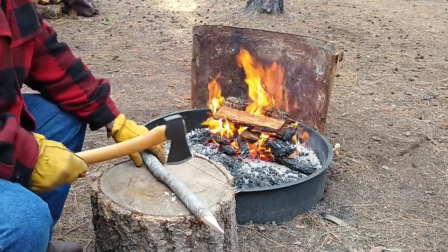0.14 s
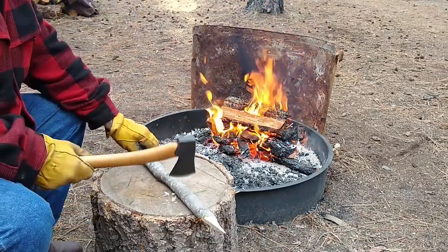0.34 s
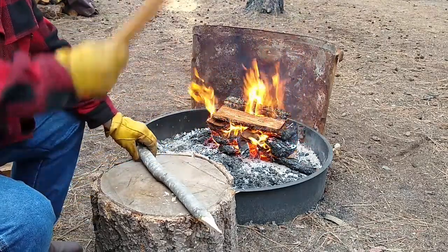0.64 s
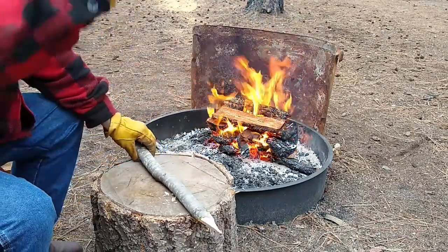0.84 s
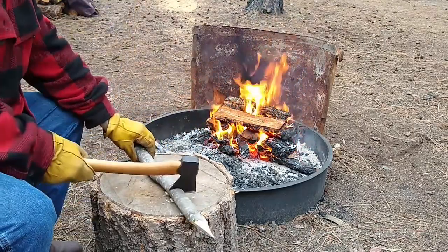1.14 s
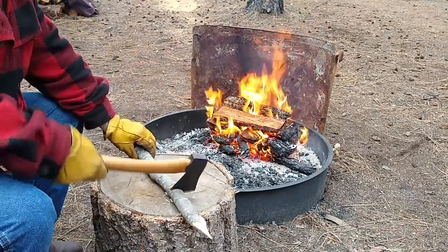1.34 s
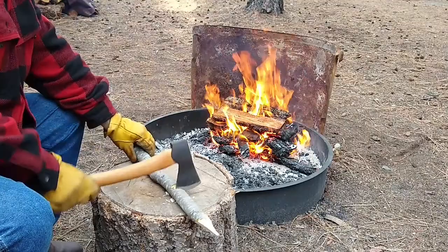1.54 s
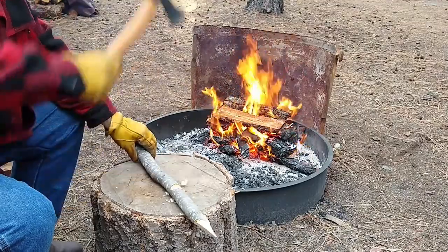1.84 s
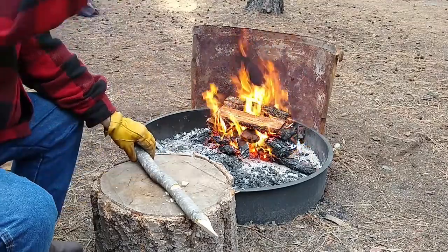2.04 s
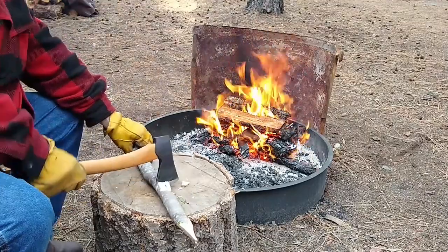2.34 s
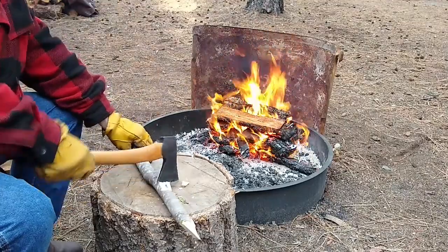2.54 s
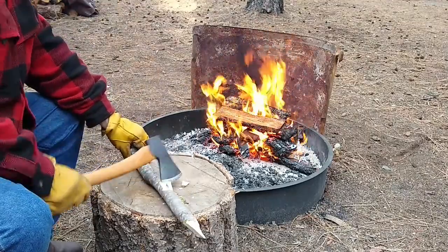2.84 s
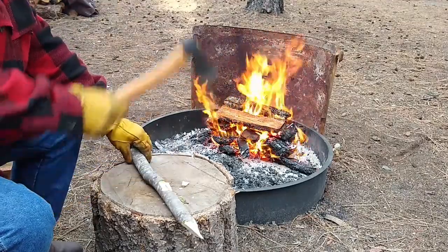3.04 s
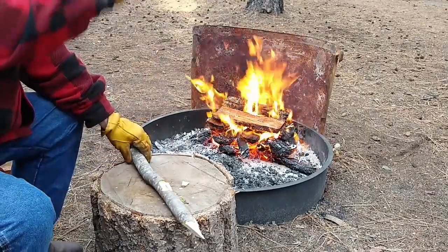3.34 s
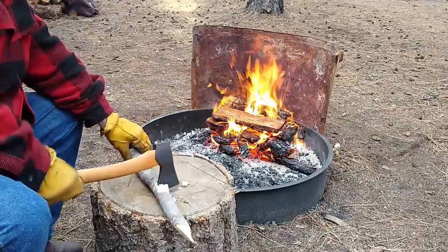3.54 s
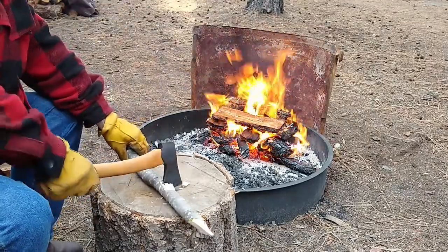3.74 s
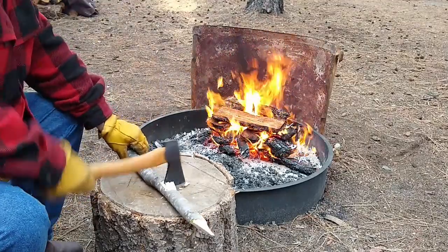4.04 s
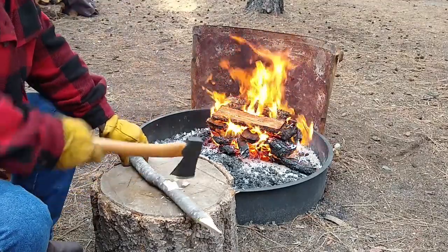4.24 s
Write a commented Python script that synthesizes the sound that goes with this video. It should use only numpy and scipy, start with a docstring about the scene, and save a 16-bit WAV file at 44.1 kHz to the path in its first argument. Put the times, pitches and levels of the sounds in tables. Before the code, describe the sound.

Three sharp hatchet chops crack into a green stick on a stump while a campfire pops and ticks softly outdoors.

```python
"""Three sharp hatchet chops into a green stick on a stump, beside a campfire among trees.
Each blow sums noise from parting fibres, damped modes of the stick and a dull thud of the stump.
Sparse echo taps and delayed copies model scattering by the ground, the fire ring and the trunks.
The fire adds filtered pops, hiss and ticks; light taps sound, crumbs of bark patter, a sleeve rustles.
A far bird makes short falling tones over a low outdoor wash of shaped noise."""
import sys
import numpy as np
from scipy import signal
from scipy.fft import rfft, irfft
from scipy.io import wavfile
from scipy.ndimage import uniform_filter1d

SR = 44100
rng = np.random.default_rng(int(sys.argv[2]) if len(sys.argv) > 2 else 0)


def digitize_waveform(pressure):
    """Quantize a signal to 16-bit integers and store it at the path in sys.argv[1].

    Rows of a 2-D input are taken as channels; values are limited to [-1, 1].
    """
    field = np.atleast_2d(pressure).T
    bounded = np.clip(field, -1, 1)
    quanta = np.round(bounded * 32767).astype(np.int16)
    wavfile.write(sys.argv[1], SR, quanta)


N = 193818  # length of the scene in samples

# Spectra are relative unless stated otherwise; wood levels precede the colouring of the blow.
# blows: (time [s], crack level [dB], knock delay [s], stick tuning [factor], mode with a node at the cut [Hz],
#         push level [dB], push pitch [Hz], push delay [s], free-end pitch [Hz], free-end level [dB],
#         hardness at 3 kHz [dB], splintering at 7 kHz [dB], fizz at 13 kHz [dB])
BLOWS = [(1.1060, -9.5, .0016, 0.99, 1400, -18.5, 394, 0.0032, 1013, -24.5, 3, 0, -3.5),
         (2.3429, -10, .0009, 1.02, 504, -25.5, 225, .0055, 1200, -25, 0.5, -7, 1),
         (3.5897, -13, 0.001204, 1.02, 656.6, -31, 218.6, 0.0054, 1039, -24, -1, 5.5, 4.5)]
# modes of the stick pressed on the stump: (frequency before tuning [Hz], level [dB], 60 dB decay time [s])
STICK_MODES = [(430, -19, 0.048), (699.7, -5.5, 0.022), (939, -8.5, 0.025), (1192, -2.5, 0.015),
               (1463, -6.5, 0.018), (1640, -5.5, 0.033), (1990, -5, 0.022), (2576, 0, 0.0081),
               (3325, -4.5, 0.013), (5580, -8, .014), (6620, -13, 0.012), (7640, -12.5, 0.012)]
# dull thud of stump and ground: (frequency [Hz], level [dB])
STUMP_SPECTRUM = [(25, -30), (36, -13), (48, -3), (68, 4), (95, -8), (120, -1), (175, -5), (250, -13.5),
                  (400, -22.5), (1000, -48.5), (4000, -82)]
# parting fibres: (frequency [Hz], level [dB])
CRACK_SPECTRUM = [(200, -21.5), (900, -7.5), (1900, 3.5), (3400, -3.5), (4300, -10.5), (5500, -7),
                  (7000, -7), (8400, -1.5), (10000, -11.5), (11500, -15), (13000, -16.5), (16000, -22)]
# sound thrown sideways into the clearing: (frequency [Hz], level [dB])
SIDEWAYS_SPECTRUM = [(30, -22), (100, -9.5), (250, -3), (400, -2), (700, 1.5), (1100, -2), (1700, -2),
                     (2600, -2), (3500, -6), (4500, -9.5), (6000, -13), (9000, -12), (11500, -21.5),
                     (16000, -24.5)]
# time the edge takes to cut in [s]; levels of the knock, the thud and the sideways sound [dB]
CUT_S, KNOCK_DB, THUD_DB, SIDEWAYS_DB = 0.0026, -8.5, -41.5, -13

# light taps of chips and bark, and one faint low blip just before the third blow:
# (time [s], peak level [dB], pitch [Hz])
LIGHT_TAPS = [(1.0626, -43, 3300), (1.2655, -37.5, 8750), (1.3257, -41, 7400), (1.3801, -42.5, 7700),
              (2.2943, -47, 1120), (2.519, -43, 5500), (3.5793, -34, 600), (3.78, -39, 6000),
              (3.8054, -42, 8550)]

# loud bursts of resin pockets: (time [s], level [dB], woody low part [dB], sharp top [dB])
RESIN_POPS = [(0.2863, -42.5, 1.5, 1), (0.3142, -42, 2, 5), (0.4843, -44, -1, -1), (.9461, -23, 0, -6.5),
              (1.723, -47, 5, -3), (2.0606, -37, 3, 0), (2.316, -42.5, 2, 0.5), (2.7875, -47, -2, 1),
              (3.034, -40.5, -12, 4), (3.0573, -38.5, 5, 2.5), (3.1731, -35, -6.5, 1.5),
              (3.3172, -34.5, 2.5, -4), (3.4018, -35.5, -1, 1), (4.2859, -41, 2, 6),
              (4.2903, -24.5, -2, -3)]
# snap of one pop: (frequency [Hz], level [dB])
SNAP_SPECTRUM = [(300, -36), (1000, -19.5), (2800, -11.5), (4200, -13), (6000, -7.5), (8000, -0.5),
                 (9000, 0.5), (9700, -4.5), (11000, -6), (13000, -11), (16000, -17)]
# jets of steam: (time [s], level [dB], time to the peak [s])
STEAM_JETS = [(4.293, -41.5, 0.0048)]
# escaping steam: (frequency [Hz], level [dB])
STEAM_SPECTRUM = [(1000, -19), (2200, -11), (3300, 0), (4500, -11.5), (6500, -16), (7800, 9), (9500, -9),
                  (15000, -13)]
# tiny ticks of the embers: (frequency [Hz], level [dB])
EMBER_SPECTRUM = [(1000, -24), (4000, -12), (8500, 6), (11000, -2.5), (16000, -13.5)]
# delay [s] and level [dB] of the second snap in each pop
SECOND_SNAP_S, SECOND_SNAP_DB = 0.0011, -1
# random small pops: mean rate [per s], level [dB], greatest deviation either way [dB]
CRACKLE_PER_S, CRACKLE_DB, CRACKLE_SPREAD_DB = 4, -52.5, 4

# moves of the arm: (time of the peak [s], level [dB], time to swell and to fade [s])
SLEEVE_MOVES = [(.01, -67, 0.021), (.385, -64.5, 0.029), (1.62, -72, 0.19), (2.88, -71.5, 0.17),
                (4.0, -64.5, .045), (4.23, -66.5, 0.086)]
# rubbing cloth: (frequency [Hz], level [dB])
CLOTH_SPECTRUM = [(500, -15.5), (1800, -2.5), (3300, 0), (6000, -1.5), (9000, 1.5), (15000, -16.5)]
SLEEVE_REST_DB = -83  # faint rubbing between the moves

# a small bird far off: (time [s], level before spreading [dB], starting pitch [Hz])
BIRD_CHIRPS = [(1.44, -70, 3580), (1.515, -69, 3300), (4.195, -66, 3600), (4.259, -68, 3480)]
CHIRP_GLIDE_HZ_PER_S = -18000

# flames and distant wind: (frequency [Hz], level [dB])
AIR_SPECTRUM = [(15, -63), (25, -37), (59, -3), (137, -4), (180, -4.5), (354, -14), (476, -10), (575, -9.5),
                (734, -10), (840, -12.5), (962, -13), (2840, -27.5), (6920, -32.5), (9070, -27.5),
                (16000, -39.5)]
AIR_DB = -62

# groups of echoing surfaces: (delay of the peak [s], relative level [dB], fall [dB per s])
SCATTER_GROUPS = [(.007, 6, 801), (.032, -2.5, 300), (.125, -19, 169.5)]
# colour of the scattered sound: (frequency [Hz], level [dB])
ECHO_SPECTRUM = [(60, 6), (200, 3), (400, 0), (800, -1.5), (1700, 0), (3200, -2), (6000, -1.5), (9000, -1),
                 (15000, -4)]
# trunks returning distinct echoes: (delay [s], level [dB], brightest pitch [Hz])
TRUNK_ECHOES = [(0.11, -33.5, 3220), (0.1256, -29, 5550)]

# left port for sound straight from the scene: (frequency [Hz], gain [dB])
DIRECT_LEFT_GAIN = [(100, -2), (1000, 2), (2200, -6), (4500, -4.5), (6500, -4.5), (8500, -11),
                    (14000, -4.5)]
# phase lead of the left port at side = 1: (frequency [Hz], phase [radians])
PORT_LEAD = [(100, 0.14), (1000, .15), (2600, .5), (4500, 1.3), (8000, 1.8), (10000, 1.64), (12000, 1.8),
             (16000, 0.68)]
# likeness of the two ports in a diffuse field: (frequency [Hz], correlation [-1 to 1])
FIELD_LIKENESS = [(60, .85), (130, 0.89), (290, 0.86), (640, .43), (1400, 0), (7000, 0.028)]
# left port in a diffuse field: (frequency [Hz], gain [dB])
DIFFUSE_LEFT_GAIN = [(100, -1), (1200, -1), (2400, -2), (4400, -1.5), (8200, -5), (15000, -2.5)]
EDGE_HZ = 16000  # upper band limit


def chop(s, crack_db, knock_s, tuning, node_hz, push_db, push_hz, push_s, end_hz, end_db,
         hard_db, splinter_db, fizz_db):
    """Fracture and impact excitation: the edge tears fibres, then knocks the stick into the stump."""
    wood, sideways, ground = np.zeros(N), np.zeros(N), np.zeros((2, N))
    t = np.arange(SR // 2) / SR
    impact_s = s + knock_s

    tearing = np.minimum(t / (0.5 * CUT_S), 1) * np.exp(-np.maximum(t - CUT_S, 0) / 0.0023)
    crack = colour(burst(tearing[:1024]), CRACK_SPECTRUM)
    add(wood, s, amp(crack_db) * lasting(crack, CUT_S))

    add(wood, impact_s, amp(KNOCK_DB) * ring(STICK_MODES, tuning, rise_s=0.00014))
    free_end = np.sin(2 * np.pi * end_hz * t) * np.exp(-t / 0.0055)
    add(wood, impact_s, amp(end_db) * free_end)

    # the stick gives briefly as it is pressed flat
    pressing = np.exp(-((t - push_s) / 0.0027) ** 2)
    add(wood, impact_s, amp(push_db) * np.sin(2 * np.pi * push_hz * t) * pressing)

    wood = colour(wood, [(1400, 0), (3200, hard_db), (4400, hard_db), (6500, splinter_db),
                         (9500, splinter_db / 2), (12500, fizz_db)])
    # a mode with a node under the edge is weakly excited
    wood = colour(wood, [(node_hz / 1.22, 0), (node_hz, -9), (node_hz * 1.22, 0)])

    # summed over all directions, the blow is a smooth click that the surroundings throw back
    click = colour(signal.unit_impulse(1024), SIDEWAYS_SPECTRUM)
    click = colour(click, [(1400, 0), (3500, hard_db / 2), (7000, 0)])
    add(sideways, impact_s, amp(SIDEWAYS_DB) * lasting(click, 0.0011))

    # the heavy stump answers late and rocks on for a while
    rocking = np.exp(-((t - 0.031) / 0.025) ** 2) + 0.41 * np.exp(-t / 0.17)
    for channel in ground:
        thud = colour(burst(rocking), STUMP_SPECTRUM, size=8192)
        add(channel, impact_s, amp(THUD_DB) * lasting(thud, 0.03))

    direct = ports(wood, side=1)
    scattered = clearing(sideways + amp(-22) * wood)
    return direct + scattered + trunks(wood) + diffuse(ground)


def light_taps():
    """Impact noise: short, peaked bursts give the taps of chips and bark and one faint low blip."""
    taps, t = np.zeros(N), np.arange(1024) / SR
    for s, db, hz in LIGHT_TAPS:
        spectrum = [(hz / 4, -20), (hz, 0), (hz * 2, -12), (hz * 8, -45)]
        tap = colour(burst(np.exp(-t / 0.0016)), spectrum)
        add(taps, s, amp(db) * tap / abs(tap).max())
    return ports(taps, side=1)


def grit():
    """Random impacts: crumbs of bark spray from each cut and patter down ever more softly."""
    crumbs, t = np.zeros(N), np.arange(SR // 3) / SR
    for s, *_ in BLOWS:
        hits = rng.random(len(t)) < 110 / SR  # mean of 110 per second
        sizes = rng.standard_normal(len(t)) * hits
        add(crumbs, s + 0.015, amp(-24.5) * sizes * np.exp(-t / 0.064))
    spectrum = [(800, -19.5), (3000, -3), (5500, -1.5), (9000, -4.5), (16000, -15)]
    return ports(colour(crumbs, spectrum), side=0.5)


def fire():
    """Sudden release and random impulses: pops and a spit of steam over crackle and ember ticks."""
    sound, t = np.zeros(N), np.arange(SR // 10) / SR
    for s, *snap in RESIN_POPS:
        add(sound, s, pop(*snap))
    for s, db, peak_s in STEAM_JETS:
        hiss = colour(burst(t * np.exp(-t / peak_s)), STEAM_SPECTRUM)
        add(sound, s, amp(db) * lasting(hiss, 2 * peak_s))

    # one small pop repeated at random times and levels
    crackle = amp(CRACKLE_SPREAD_DB * rng.uniform(-1, 1, N)) * (rng.random(N) < CRACKLE_PER_S / SR)
    sound += signal.fftconvolve(crackle, pop(CRACKLE_DB, woody_db=2.5, top_db=-0.5))[:N]

    sizes = amp(3 * np.minimum(rng.exponential(1, N), 3)) * rng.choice([-1, 1], N)
    ticks = sizes * (rng.random(N) < 50 / SR)  # mean of 50 per second
    sound += amp(-45) * colour(ticks, EMBER_SPECTRUM)

    scattered = clearing(colour(sound, [(2500, 0.5), (8000, -6), (13000, -2)]))
    return ports(sound, side=-1.1) + amp(-13) * scattered


def pop(db, woody_db, top_db):
    """Sudden pressure release: a resin pocket bursts with a sharp snap and a softer second one."""
    t = np.arange(512) / SR
    snap = burst(np.exp(-t / 0.00013))
    add(snap, SECOND_SNAP_S, amp(SECOND_SNAP_DB) * burst(np.exp(-t / 0.00069)))
    snap = colour(snap, SNAP_SPECTRUM)
    snap = colour(snap, [(3000, woody_db), (7000, 0), (9000, 0), (12000, top_db)])
    return amp(db) * lasting(snap, 0.001)


def sleeve():
    """Friction noise: cloth rubs in fine grains, swelling and fading with each move of the arm."""
    t = np.arange(N) / SR
    level = amp(SLEEVE_REST_DB)
    for s, db, swell_s in SLEEVE_MOVES:
        level = level + amp(db) * np.exp(-((t - s) / swell_s) ** 2)
    noise = rng.standard_normal((2, N))
    graininess = unit(uniform_filter1d(rng.standard_normal(N), size=90))
    grains = noise * amp(4 * graininess)
    return level * diffuse(np.array([unit(colour(side, CLOTH_SPECTRUM)) for side in grains]))


def bird():
    """Frequency glide: faint short falling chirps, heard mostly as echoes among the trees."""
    song, t = np.zeros(N), np.arange(SR // 40) / SR
    for s, db, hz in BIRD_CHIRPS:
        phase = 2 * np.pi * (hz + CHIRP_GLIDE_HZ_PER_S * t / 2) * t
        add(song, s, amp(db) * np.hanning(len(t)) * np.sin(phase))
    return 0.5 * ports(song, side=0) + amp(4.5) * clearing(song)


def air():
    """Turbulence noise: flutter of the flames and distant wind in the trees, gently uneven."""
    hz = np.fft.rfftfreq(N, 1 / SR)
    noise = rfft(rng.standard_normal((2, N)), axis=1)
    wash = irfft(noise * amp(read(AIR_SPECTRUM, hz)), N, axis=1)
    swell_db = unit(uniform_filter1d(rng.standard_normal(N), size=5000, mode="wrap"))
    return amp(AIR_DB + swell_db) * unit(diffuse(wash))


def clearing(x):
    """Diffuse reflection: dense echoes from ground and fire ring, then a late wash from the trees."""
    t = np.arange(SR // 2) / SR
    level = np.sqrt(sum(scatter(t, *row) ** 2 for row in SCATTER_GROUPS))
    # about 6000 echoes per second at each port
    taps = rng.standard_normal((2, len(t))) * (rng.random((2, len(t))) < 6000 / SR) * level
    echoes = []
    for side in taps:
        response = colour(side / np.linalg.norm(side), ECHO_SPECTRUM)
        echoes.append(signal.fftconvolve(x, response)[:N])
    return diffuse(np.array(echoes))


def scatter(t, peak_s, db, fall_db_per_s):
    """Exponential decay: echoes from one group of surfaces build to a peak, then die away evenly."""
    return np.minimum(t / peak_s, 1) ** 2 * amp(db - fall_db_per_s * np.maximum(t - peak_s, 0))


def trunks(x):
    """Discrete reflection: each trunk returns a late copy, smeared and coloured by its rough bark."""
    echo, t = np.zeros(SR // 4), np.arange(1024) / SR
    for delay_s, db, hz in TRUNK_ECHOES:
        bark = colour(burst(np.exp(-t / 0.0015)), [(hz / 3, -18), (hz, 0), (hz * 2, -10)])
        add(echo, delay_s, amp(db) * bark)
    return ports(signal.fftconvolve(x, echo)[:N], side=0.5)


def ports(x, side):
    """Level and phase cues: the left port is shaded and leads in phase by the side of the source."""
    hz = np.fft.rfftfreq(N, 1 / SR)
    lead = np.exp(1j * side * read(PORT_LEAD, hz))
    left = irfft(rfft(x) * amp(read(DIRECT_LEFT_GAIN, hz)) * lead, N)
    return np.array([left, x])


def diffuse(pair):
    """Spatial coherence: two signals become a field alike in the bass and apart in the treble."""
    hz = np.fft.rfftfreq(N, 1 / SR)
    a, b = rfft(pair, axis=1)
    same = np.clip(read(FIELD_LIKENESS, hz), -1, 1)
    left = (same * a + np.sqrt(1 - same ** 2) * b) * amp(read(DIFFUSE_LEFT_GAIN, hz))
    return irfft(np.array([left, a]), N, axis=1)


def ring(modes, tuning, rise_s):
    """Modal superposition: damped modes of alternating sign swell over the contact time."""
    t = np.arange(SR // 2) / SR
    tone = np.zeros(len(t))
    for k, (hz, db, t60) in enumerate(modes):
        tone += (-1) ** k * amp(db - 60 * t / t60) * np.sin(2 * np.pi * hz * tuning * t)
    return tone * (1 - np.exp(-t / rise_s))


def burst(envelope):
    """Spectral whitening: a noise shower under an envelope is flattened and scaled to unit energy."""
    z = rfft(rng.standard_normal(len(envelope)) * envelope)
    flat = irfft(z / (abs(z) + 1e-12), len(envelope))
    x = flat * (envelope / envelope.max()) ** (1 / 4)  # tames the noise spread by flattening
    return x / np.linalg.norm(x)


def colour(x, points, size=2048):
    """Minimum-phase filtering: a causal filter takes its phase from the log spectrum."""
    log_gain = np.log(amp(read(points, abs(np.fft.fftfreq(size, 1 / SR)))))
    taps = np.fft.ifft(np.exp(np.conj(signal.hilbert(log_gain)))).real[:size // 2]
    return signal.fftconvolve(x, taps)[:len(x)]


def read(points, hz):
    """Logarithmic pitch scale: interpolates a spectrum on a log-frequency axis."""
    f, value = np.transpose(points)
    return np.interp(np.log(hz + 1), np.log(f + 1), value)


def lasting(x, seconds):
    """Energy scaling: gives a short sound the energy of that many seconds at an rms of one."""
    return x / np.linalg.norm(x) * np.sqrt(seconds * SR)


def unit(x):
    """Power normalisation: scales to an rms of one."""
    return x / np.sqrt(np.mean(x ** 2) + 1e-20)


def amp(db):
    """Decibel law: converts a level to a gain."""
    return 10 ** (np.asarray(db) / 20)


def add(mix, s, sound):
    """Linear superposition: mixes a sound in place at time s."""
    part = mix[max(round(s * SR), 0):][:len(sound)]
    part += sound[:len(part)]


def scene():
    """Superposition of blows, light taps and grit, fire, sleeve, bird and air."""
    blows = sum(chop(*row) for row in BLOWS)
    return blows + light_taps() + grit() + fire() + sleeve() + bird() + air()


def record(dry):
    """Saturation and band limiting: peaks are rounded, deep rumble is cut, then the top is limited."""
    rounded = dry / (1 + dry ** 6) ** (1 / 6)
    lean = signal.sosfilt(signal.butter(2, 34, "highpass", fs=SR, output="sos"), rounded)
    lowpass = signal.firwin(401, EDGE_HZ, window=("kaiser", 9), fs=SR)
    return signal.oaconvolve(lean, lowpass[None], "same")


dry = scene()
out = record(dry)
digitize_waveform(out)
```